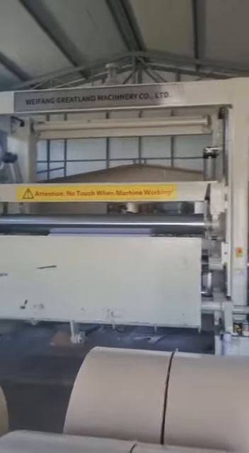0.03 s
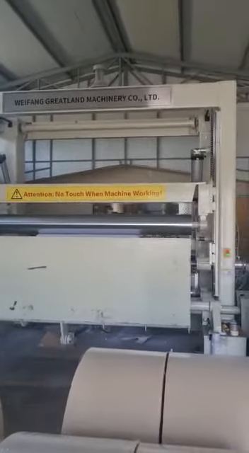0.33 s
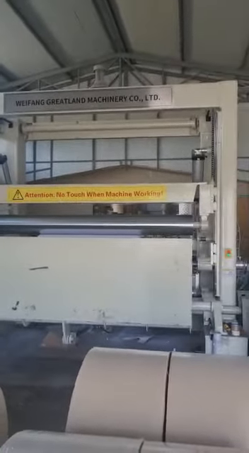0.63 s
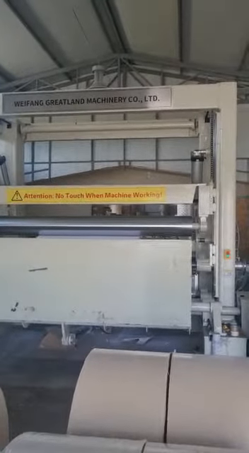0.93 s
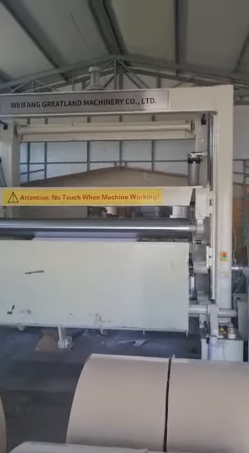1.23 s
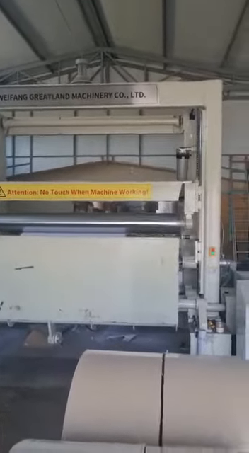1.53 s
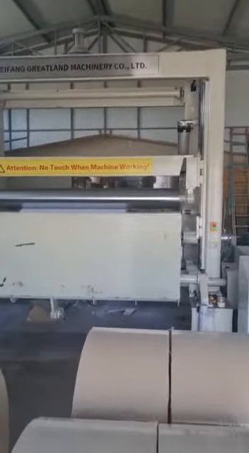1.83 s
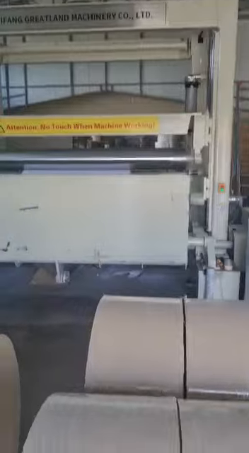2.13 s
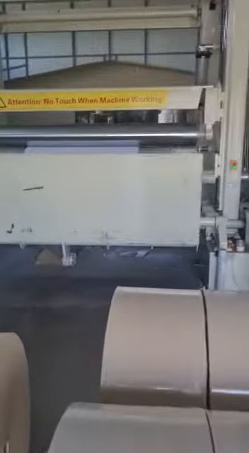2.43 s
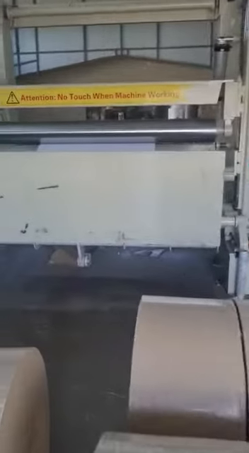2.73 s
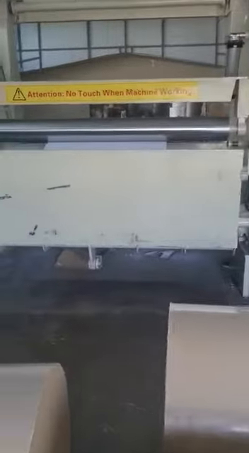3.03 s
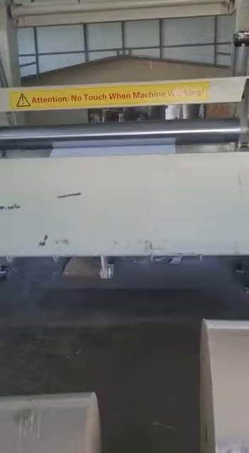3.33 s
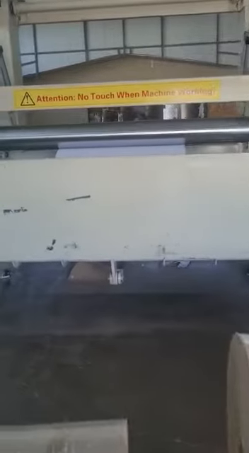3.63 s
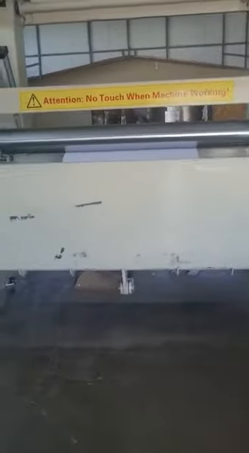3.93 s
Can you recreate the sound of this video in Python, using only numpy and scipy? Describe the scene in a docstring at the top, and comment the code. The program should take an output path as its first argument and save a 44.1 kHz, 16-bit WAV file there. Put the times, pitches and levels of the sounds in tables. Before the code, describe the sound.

Paper rewinding machinery drones and rattles steadily over rushing paper in a rumbling factory hall.

```python
"""A drone with a throbbing rattle, over a steady rush: a machine is slitting and rewinding paper.
The winding roll drones as its ridges pass the drum; its unevenness makes the rattle repeat every turn.
The moving paper rushes and rings the frame, the motor drives whine, and the factory hall rumbles.
The listener walks slowly towards the machine, through spots where the drone is louder or softer."""
import sys
import numpy as np
from scipy import signal
from scipy.fft import rfft, irfft
from scipy.io import wavfile
from scipy.ndimage import map_coordinates

SR = 44100
rng = np.random.default_rng(int(sys.argv[2]) if len(sys.argv) > 2 else 0)


def put_to_file(sound):
    """Save the sound as 16-bit audio at rate SR, in the file named by the first command-line argument."""
    columns = np.atleast_2d(sound).T  # one column per channel
    safe = np.clip(columns, -1, 1)
    whole_steps = np.round(safe * 32767)
    wavfile.write(sys.argv[1], SR, whole_steps.astype(np.int16))


N = 176400
TIME = np.arange(N) / SR
ROLL_HZ, MOTOR_HZ = 3.78, 30.2  # turns per second
SIDES = np.array([[1], [-1]])  # plus for the left ear, minus for the right


def undb(db):
    """Turn decibels into a number to multiply by."""
    return 10 ** (np.asarray(db) / 20)


def unit(x):
    """Scale a signal to an average power of 1."""
    return x / np.sqrt(np.mean(x ** 2))


def curve(rows, column=1):
    """Follow one column of a time table, joining its points with straight lines."""
    rows = np.array(rows)
    return np.interp(TIME, rows[:, 0], rows[:, column])


def across(points, hz):
    """Read between the points of a frequency table, giving each octave about equal room."""
    points = np.array(points)
    return np.interp(np.log(hz + 1), np.log(points[:, 0]), points[:, 1])


def wander(rate_hz):
    """A smooth random drift, mostly between -1 and 1."""
    steps = rng.standard_normal(256)
    return map_coordinates(steps, [2 + TIME * rate_hz], order=3, mode="wrap")


def in_hall(pair, colour):
    """Shape two signals by colour(hz) and spread them as the hall does: alike only in the low notes."""
    # how alike the two ears' sounds are (frequency [Hz], likeness [0-1])
    ear_likeness = [(30, .85), (60, .94), (150, .94), (300, .84), (640, .38), (1300, 0), (15000, 0)]
    # how much louder the left ear is than the right (frequency [Hz], difference [dB])
    ear_balance = [(60, -2), (200, 0), (380, -1), (700, 0.5), (1290, -4.5), (2380, -3.5), (4400, 1.2),
                   (6500, -2), (9000, 6), (15000, 0.5)]
    hz = np.arange(N // 2 + 1) * SR / N
    common, opposite = rfft(pair) * colour(hz)
    alike = across(ear_likeness, hz)
    ears = common * np.sqrt(1 + alike) + SIDES * opposite * np.sqrt(1 - alike)
    return unit(irfft(ears * undb(SIDES * across(ear_balance, hz) / 2), N))


def surface(turn_hz):
    """The random bumps of a turning surface: the same noise comes round on every turn."""
    size = int(SR / turn_hz)
    spectrum = np.exp(2j * np.pi * rng.random(size // 2 + 1))  # all frequencies equally strong
    return np.resize(unit(irfft(spectrum, size)), N)


def turning(turn_hz, change_hz=1.7):
    """Two noises that repeat every turn and slowly change with the echoes as the listener moves."""
    place = TIME * change_hz
    fades = [np.cos(np.clip(place - k, -1, 1) * np.pi / 2) for k in range(12)]
    return np.array([sum(fade * surface(turn_hz) for fade in fades) for _ in range(2)])


def swell(depth_db, peak_turn):
    """The roll is not quite round, so it swells once a turn; peak_turn (0-1) says where."""
    return undb(depth_db * np.cos(2 * np.pi * (ROLL_HZ * TIME - peak_turn)))


def throb(depth=.15, cutoff_hz=22):
    """The pressure between roll and drum varies around the roll, the same way on every turn."""
    bumps = signal.sosfilt(signal.butter(2, cutoff_hz, fs=SR, output="sos"), surface(ROLL_HZ))
    pressure = 1 + depth * np.clip(unit(bumps - bumps.mean()), -3, 2)
    return swell(depth_db=1.98, peak_turn=.47) * pressure


def roll_drone(ridges=84, wobble_rad=.084, left_lead_rad=.24):
    """The roll's ridges pass the drum so fast that they blend into one throbbing note."""
    # loud and quiet spots along the walk, made by standing waves in the hall
    # (time [s], relative level [dB], left minus right [dB])
    drone_spots = [(0, -14.5, -.5), (.5, -14.5, -1), (.7, -12, -1), (1.25, -13.5, -2), (1.75, -14.5, -3.5),
                   (2.05, -15.5, -4.5), (2.35, -22.5, -9), (2.55, -27, -3), (2.9, -24.5, 1),
                   (3.12, -19, -5), (3.26, -30.5, -6), (3.42, -16, -6), (3.6, -28.5, -3), (3.71, -10, -4.5),
                   (3.87, -23.5, -2), (4, -19.5, -7)]
    phase = 2 * np.pi * ridges * ROLL_HZ * TIME + wobble_rad * wander(6.22)
    note = np.sqrt(2) * np.sin(phase + SIDES * left_lead_rad / 2)
    level_db = curve(drone_spots) + .5 + SIDES * curve(drone_spots, column=2) / 2
    return note * undb(level_db) * throb()


def roll_rattle():
    """The roll's uneven surface rattles near the drone's pitch and throbs in the overtones above."""
    # tone colour of the rattle (frequency [Hz], relative level [dB])
    rattle_colour = [(150, -45), (205, -25), (255, -13), (280, -8.5), (305, 1.5), (322, -5), (340, -1.5),
                     (372, -11), (392, -29), (470, -19), (560, -45)]
    # tone colour of its overtones (frequency [Hz], relative level [dB])
    overtone_colour = [(450, -30), (590, -23), (615, -10), (630, 1), (643, 1), (660, -13), (695, -6.5),
                       (735, -24), (860, -29), (950, -11.5), (1050, -31.5), (1200, -29), (1270, -22.5),
                       (1400, -62)]
    # loudness along the walk (time [s], rattle level [dB], overtone level [dB])
    roll_levels = [(0, -18, -21.5), (1, -26, -25.5), (2.3, -24.5, -25), (2.8, -20.5, -24),
                   (3.4, -17.5, -22.5), (4, -16, -23.5)]

    def within(points):  # silent outside the table's range
        return lambda hz: undb(across(points, hz)) * (hz > points[0][0]) * (hz < points[-1][0])
    rattle = in_hall(turning(ROLL_HZ, change_hz=.9), within(rattle_colour))
    overtones = in_hall(turning(ROLL_HZ), within(overtone_colour))
    overtones *= unit(swell(depth_db=1, peak_turn=.69))
    return rattle * undb(curve(roll_levels)) + overtones * undb(curve(roll_levels, column=2))


def friction(turn_hz, repeat_share):
    """Rubbing noise; repeat_share (0-1) of its power comes round again with each turn."""
    fresh = np.sqrt(1 - repeat_share) * rng.standard_normal((2, N))
    return fresh + np.sqrt(repeat_share) * turning(turn_hz)


def ring_peak(hz, pitch_hz, width_hz):
    """A ringing part answers most strongly at its own pitch, and less to either side."""
    return 1 / (1 + (2 * (hz - pitch_hz) / width_hz) ** 2)


def paper_and_frame(low_cut_hz=500, flicker_db=.4):
    """Paper rushes over rollers and knives; together with the turning motor it rings the frame."""
    # tone colour of the rushing paper (frequency [Hz], relative level [dB])
    paper_spectrum = [(620, -41), (1050, -4.5), (1720, -2.5), (2180, -1), (2530, -6.5), (2700, -9.5),
                      (3240, -4), (3540, -10), (4060, -6), (4490, -9), (5140, -12), (6370, -10.5),
                      (8630, -21.5), (12500, -22.5), (15500, -29)]
    # ringing notes of the frame and knives (pitch [Hz], width [Hz], relative level [dB])
    frame_notes = [(1293, 53, 1.5), (2137, 240, -0.5), (2510, 76, 1), (3030, 88, -0.5), (3330, 160, -2),
                   (3960, 330, -7.5), (4200, 100, -1.5), (4990, 130, -1), (5320, 180, -4),
                   (6280, 180, -12.5), (7500, 300, -11.5), (10850, 140, -15), (12140, 100, -13),
                   (12400, 170, -18), (14010, 130, -18)]
    # loudness along the walk (time [s], rush level [dB], ringing level [dB])
    paper_levels = [(0, -28.5, -31.5), (.3, -28, -31.5), (1.2, -30, -35.5), (2, -30.5, -34.5),
                    (2.7, -30, -33.5), (3.2, -28, -35), (3.6, -25.5, -32), (4, -26.5, -32.5)]

    def rush_colour(hz):
        return undb(across(paper_spectrum, hz)) * hz ** 2 / (hz ** 2 + low_cut_hz ** 2)

    def frame_colour(hz):
        peaks = [undb(db) * ring_peak(hz, pitch, width) for pitch, width, db in frame_notes]
        return np.sqrt(sum(peak ** 2 for peak in peaks))
    rush = in_hall(friction(ROLL_HZ, repeat_share=.086), rush_colour)
    ringing = in_hall(friction(MOTOR_HZ, repeat_share=.45), frame_colour)
    rush *= undb(curve(paper_levels) + flicker_db * wander(12))
    return rush + ringing * undb(curve(paper_levels, column=2))


def drive_whine(waver=.4, fade_db_per_s=.8):
    """Thin tones from the motor drives and the frame parts they shake waver at each ear and fade as the
    listener leaves them behind."""
    # thin steady tones: the drives' whine and fine lines from frame parts the motor shakes (pitch [Hz],
    # relative level [dB])
    thin_tones = [(1410, -52), (2144, -49.5), (2204, -52), (2513, -48.5), (3243, -54), (3321, -52.5),
                  (3909, -46.5), (3970, -49), (4031, -51), (4091, -53)]

    def wavering_tone(hz):
        flutter = 1 + waver * (wander(3.86) + 1j * wander(4))  # shifts both loudness and phase
        phase = 2 * np.pi * (hz * TIME + rng.random()) + 2 * wander(.936)
        return unit(np.real(flutter * np.exp(1j * phase)))
    ears = [sum(undb(db) * wavering_tone(hz) for hz, db in thin_tones) for _ in range(2)]
    return np.array(ears) * undb(3.9 - fade_db_per_s * TIME)


def hall_rumble(hum_hz=60.5, hum_db=-52.5):
    """Machinery fills the hall with a low rumble and a faint electrical hum."""
    # tone colour of the rumble (frequency [Hz], relative level [dB])
    rumble_colour = [(20, -48), (40, -22), (58, -13), (80, -8.5), (105, -8.5), (140, 1), (190, -8.5),
                     (240, -3.5), (420, 2), (490, -5.5), (545, -1), (800, -8), (1000, -11), (1300, -31)]
    # loudness along the walk (time [s], level [dB])
    rumble_levels = [(0, -24.5), (1.5, -26.5), (2.7, -27.5), (3.6, -24), (4, -23)]
    top_hz = rumble_colour[-1][0]
    hiss = rng.standard_normal((2, N))
    rumble = in_hall(hiss, lambda hz: undb(across(rumble_colour, hz)) * (hz < top_hz))
    hum = np.sqrt(2) * undb(hum_db) * np.sin(2 * np.pi * hum_hz * TIME)
    return rumble * undb(curve(rumble_levels)) + hum


def frame_singing():
    """Early on, two of the frame's notes, shaken by the motor, swell and fade."""
    # swelling notes (peak time [s], fade time [s], pitch [Hz], width [Hz], peak level [dB])
    singing_notes = [(.25, .25, 2190, 150, -36.5), (.5, 0.49, 3316, 110, -38)]
    sound = np.zeros((2, N))
    for peak_s, fade_s, pitch, width, db in singing_notes:
        note = in_hall(turning(MOTOR_HZ), lambda hz: ring_peak(hz, pitch, width))
        sound += note * undb(db) * np.exp(-((TIME - peak_s) / fade_s) ** 2)
    return sound


def scene():
    """The whole machine running in its hall."""
    machine = roll_drone() + roll_rattle() + paper_and_frame() + drive_whine()
    return machine + hall_rumble() + frame_singing()


def record(dry, top_hz=15600):
    """Cut away the very highest treble."""
    return signal.sosfilt(signal.ellip(10, .2, 80, top_hz, fs=SR, output="sos"), dry)


dry = scene()
out = record(dry)
put_to_file(out)
```